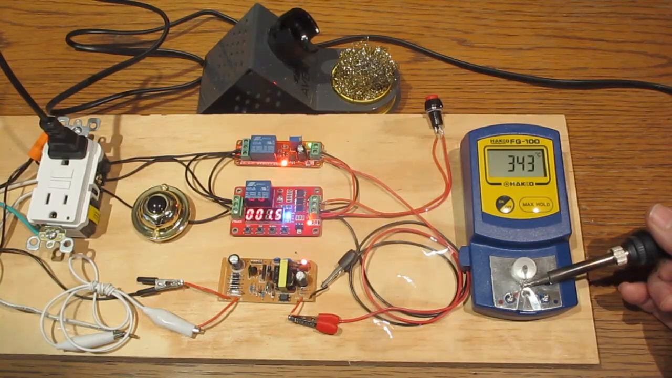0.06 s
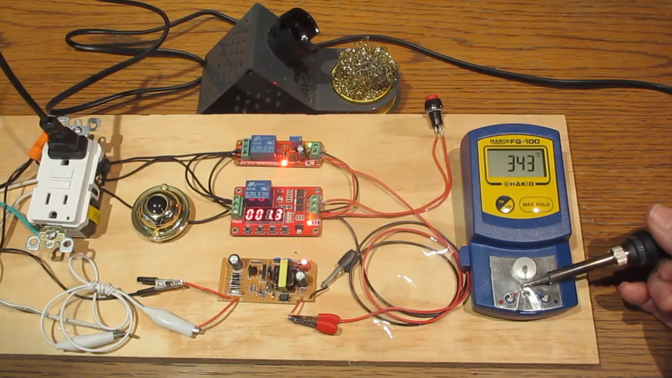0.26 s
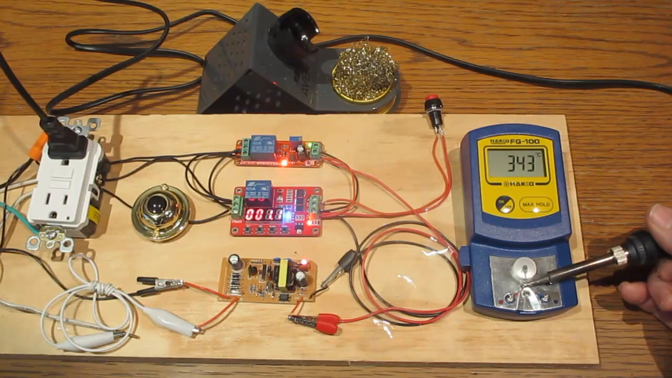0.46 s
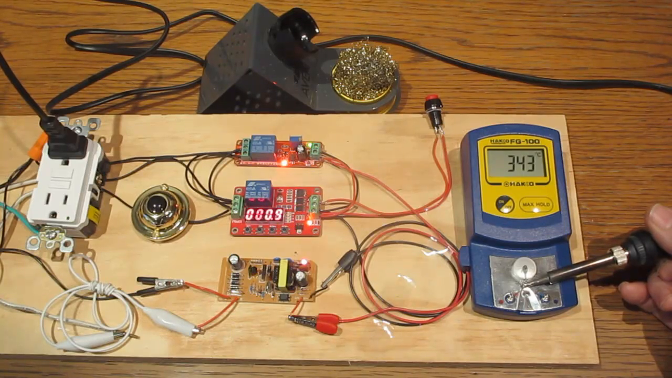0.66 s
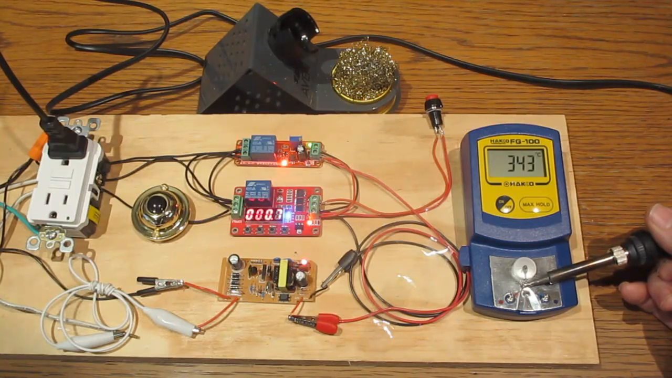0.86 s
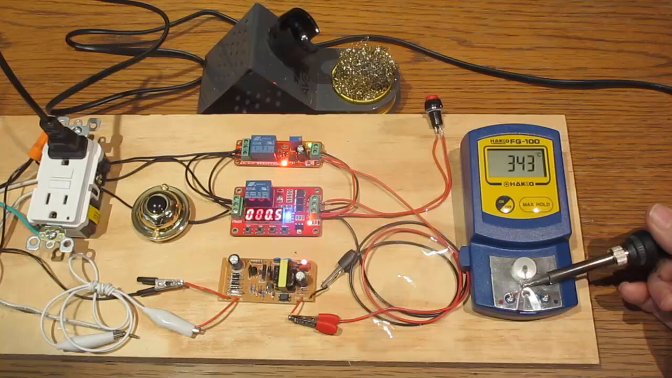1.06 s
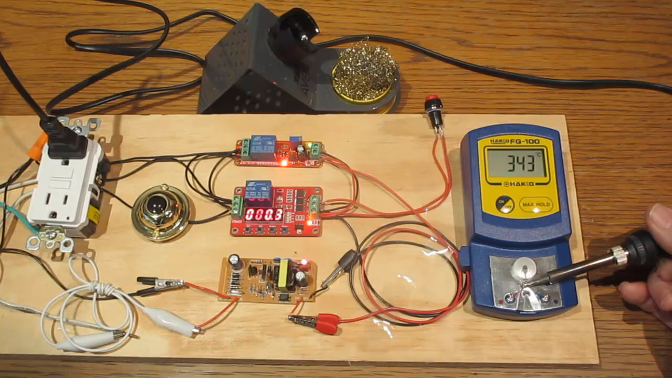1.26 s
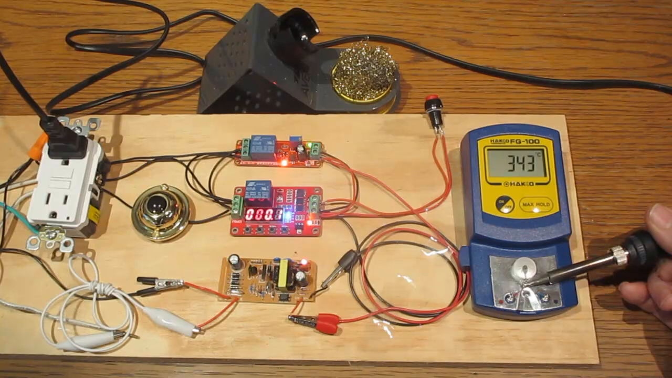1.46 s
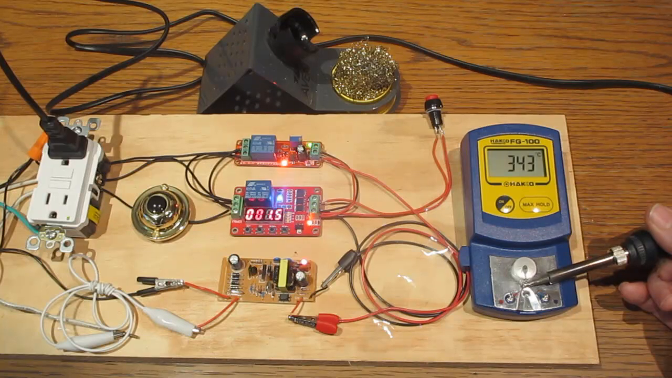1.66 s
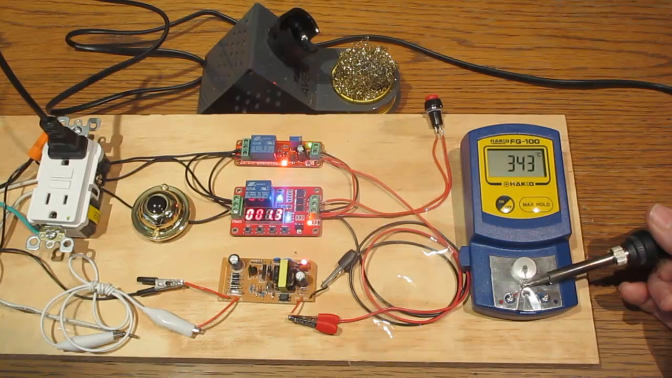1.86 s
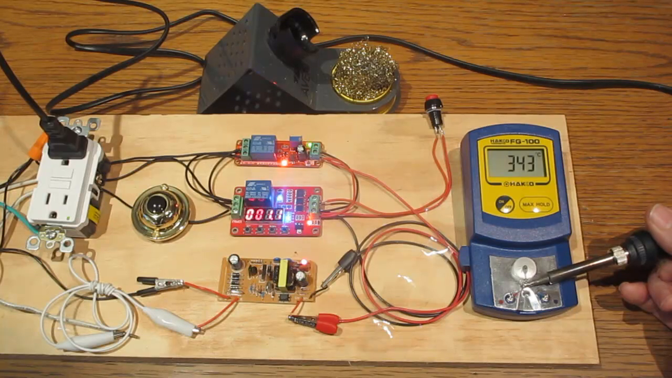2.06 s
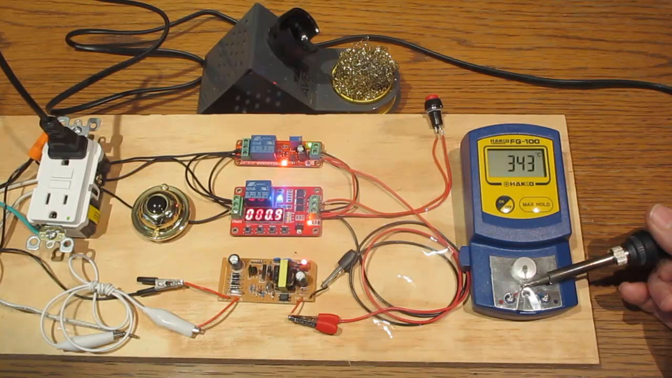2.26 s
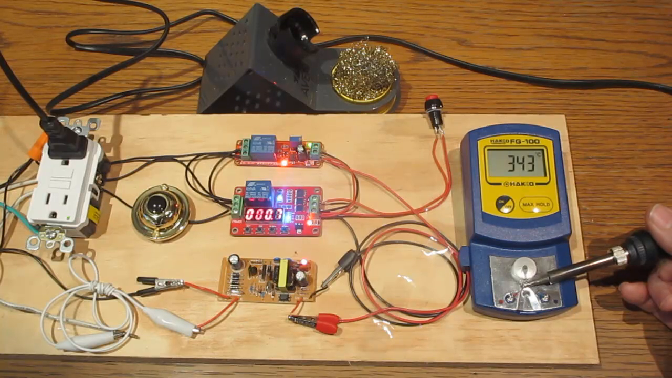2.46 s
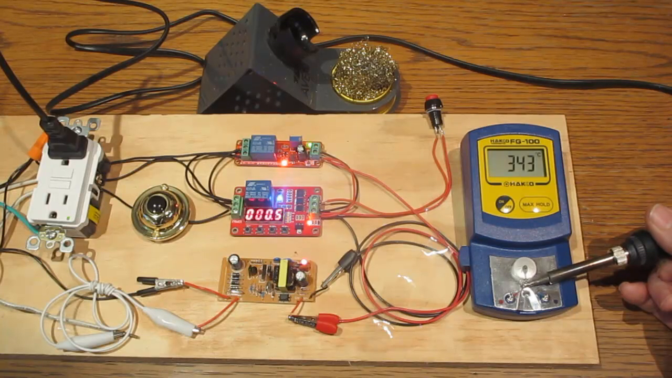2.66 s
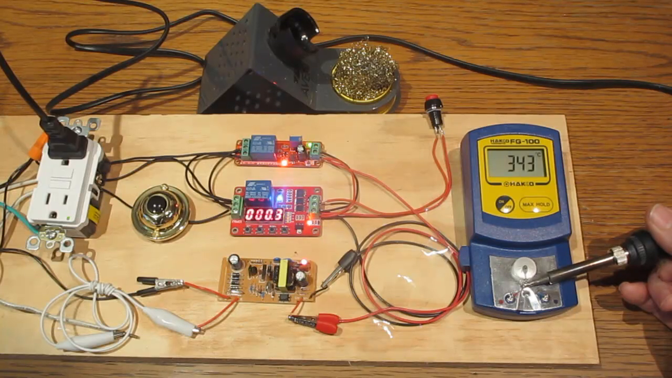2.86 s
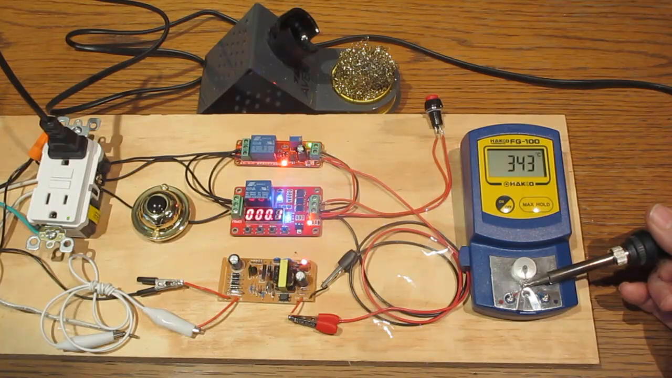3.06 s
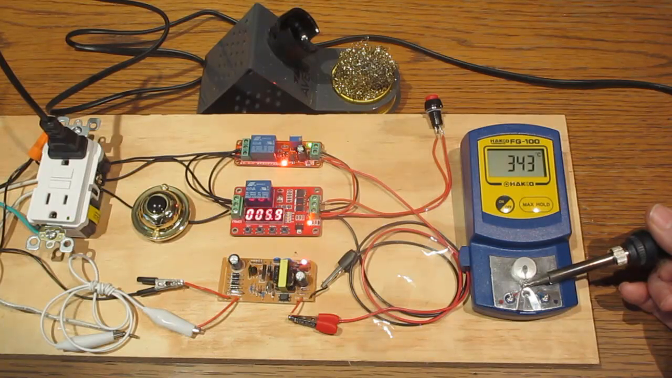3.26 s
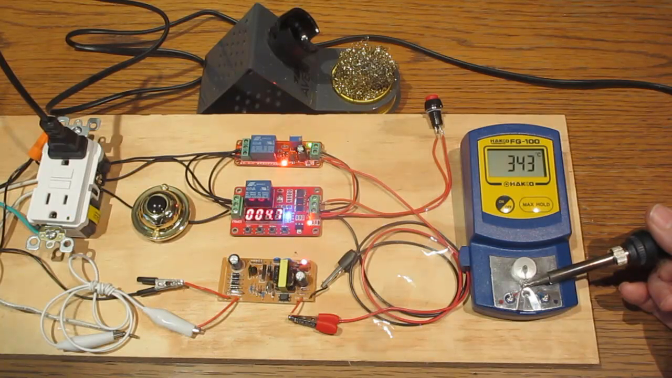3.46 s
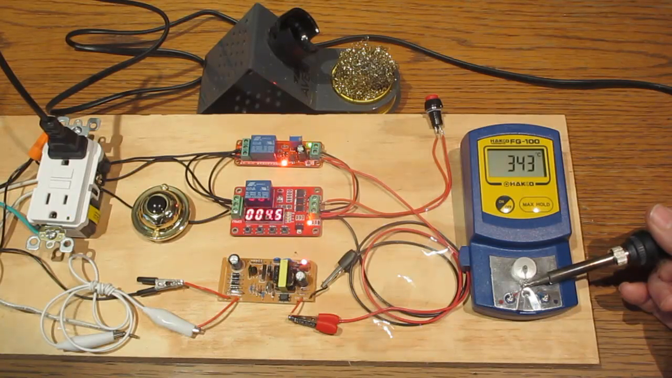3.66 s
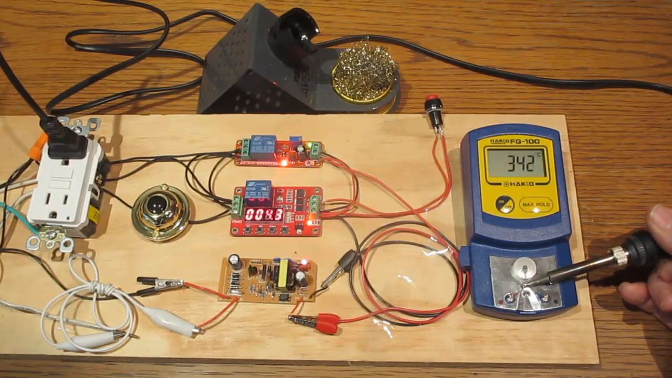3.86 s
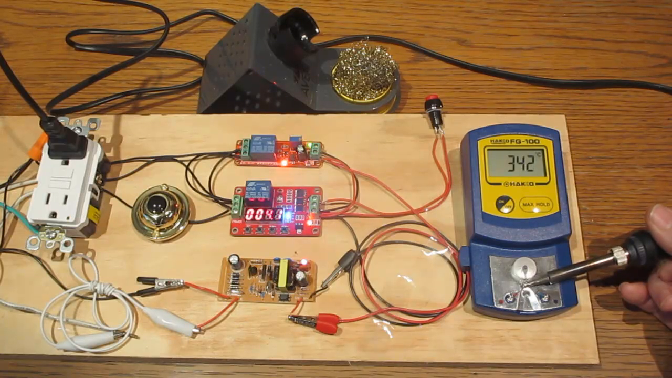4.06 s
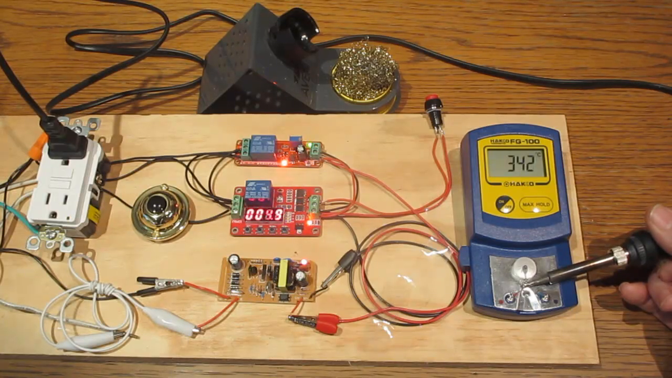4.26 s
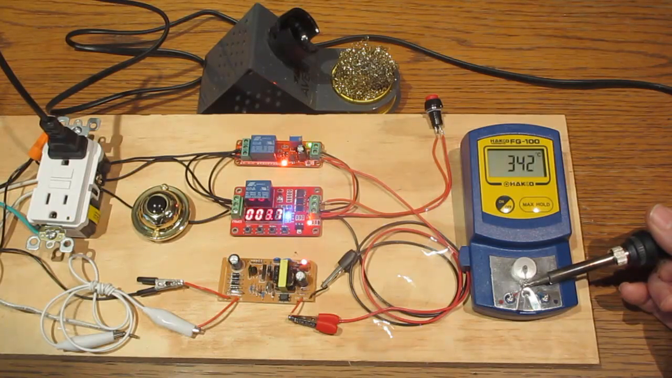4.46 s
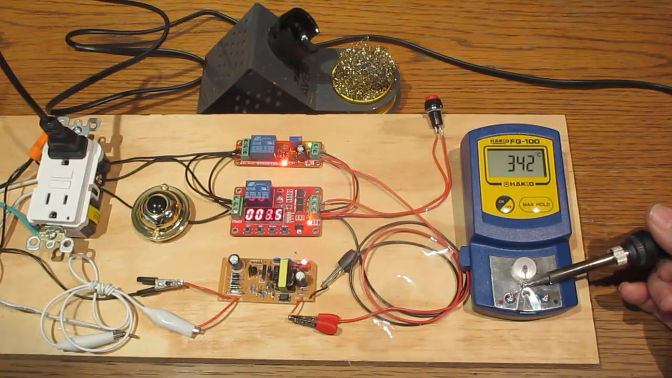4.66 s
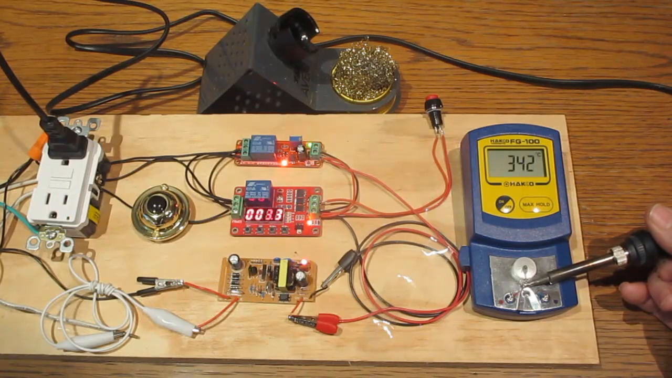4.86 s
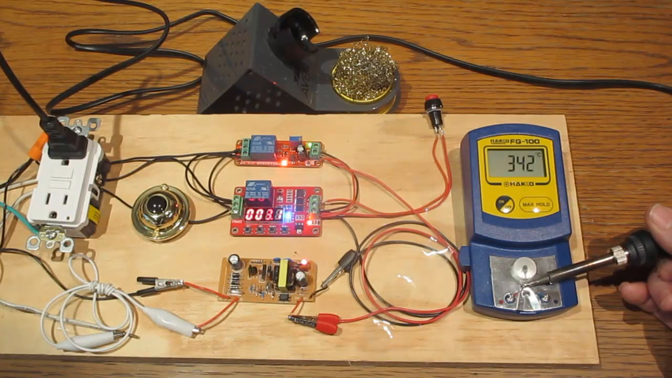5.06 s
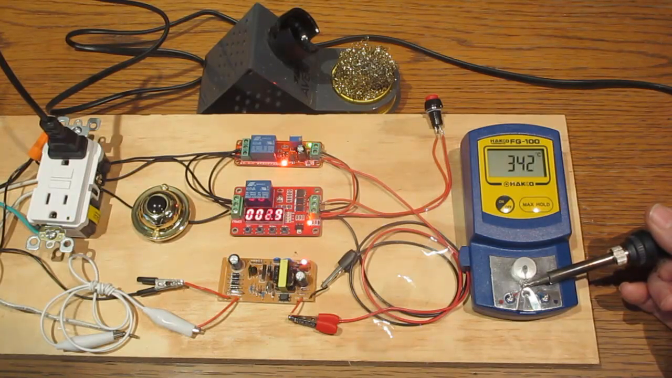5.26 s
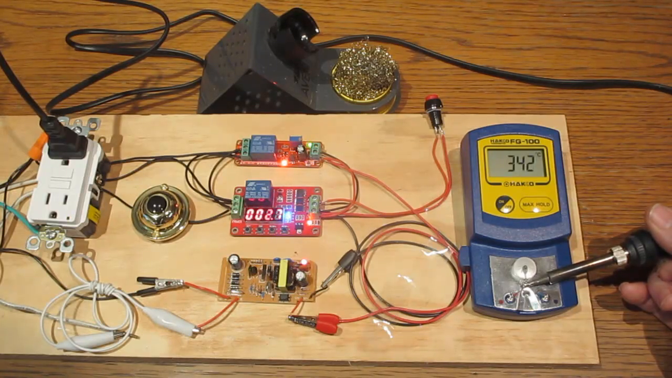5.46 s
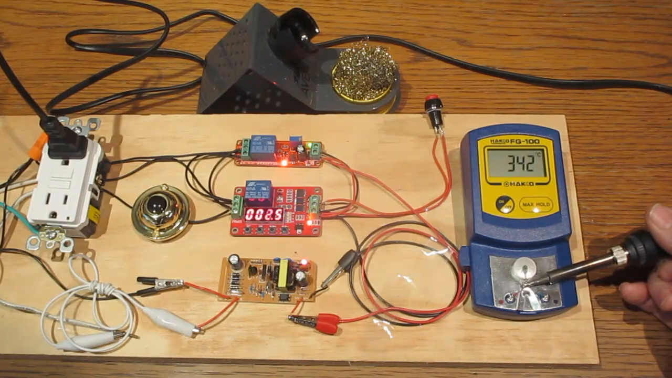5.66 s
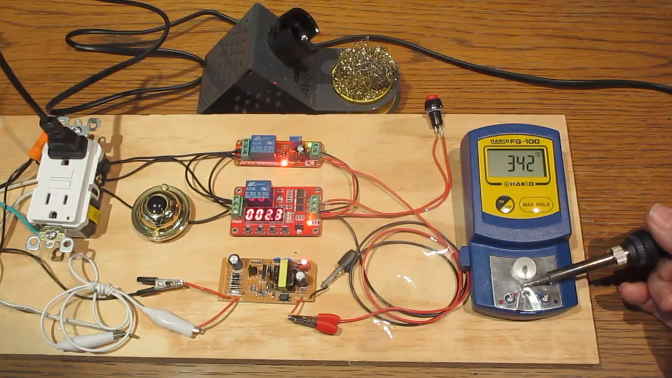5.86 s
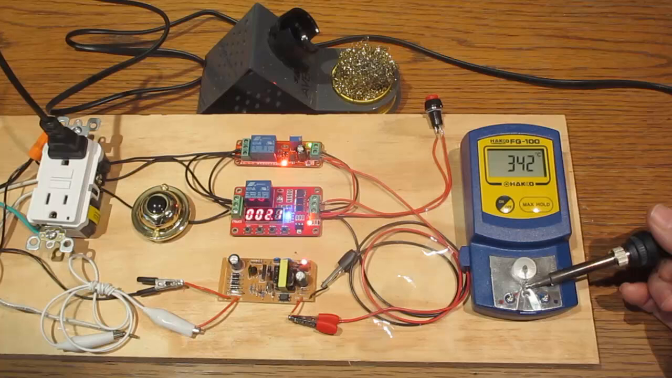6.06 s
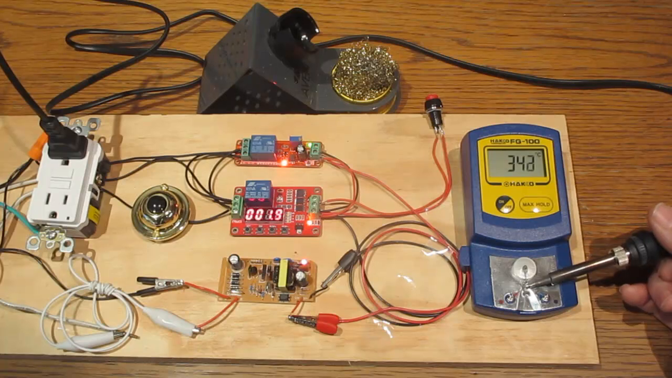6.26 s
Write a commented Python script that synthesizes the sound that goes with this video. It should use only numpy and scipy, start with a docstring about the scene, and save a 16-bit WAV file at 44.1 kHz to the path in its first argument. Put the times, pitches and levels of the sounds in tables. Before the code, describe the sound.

Over a low room hum and airy fan noise, two crisp relay clicks sound well apart, and near the end something rubs briefly on the bench.

```python
"""A small relay on a wooden bench clicks as it pulls in and later as it drops out, heard by two close microphone ports.
Each click is a few impacts that ring the case, a noise rattle, a knock of the board and echoes off bench and walls.
Behind it are shaped ventilation noise, a fading rumble, a whirr on the left, mains hum and the thin tones
of two small motors. Near the end something scuffs briefly on the bench: gritty noise in five short strokes."""
import sys
import numpy as np
from scipy import signal
from scipy.fft import rfft, irfft
from scipy.io import wavfile

SR = 44100
rng = np.random.default_rng(int(sys.argv[2]) if len(sys.argv) > 2 else 0)


def level_to_linear(level):
    """Convert decibel levels to linear amplitude factors, elementwise."""
    exponent = np.asarray(level, float) / 20
    return 10 ** exponent


def master_out(mix):
    """Clip the mix to full scale and print it as 16-bit PCM to the path in sys.argv[1]."""
    frames = np.transpose(np.atleast_2d(mix))
    ceiling = np.clip(frames, -1, 1)
    pcm = np.round(ceiling * 32767).astype(np.int16)
    wavfile.write(sys.argv[1], SR, pcm)


N = 278271
T = np.arange(N) / SR
F = np.fft.rfftfreq(N, 1 / SR) + 1e-3  # Hz, kept just above zero for logs and divisions
MAINS_HZ = 60.006

# Impacts as the armature pulls in and bounces. Each row: time [s], level [dB].
PULL_IN_IMPACTS = [(1.62261, -6), (1.62343, -17.5), (1.62411, -15.5)]
# Impacts as the contact spring snaps back and chatters. Each row: time [s], level [dB].
DROP_OUT_IMPACTS = [(3.22348, -24), (3.22384, -17), (3.22514, -27), (3.22616, -19)]
# The parts come to rest against each other and choke the ring:
# time of rest [s], time to fall 60 dB after it [s], rattle level until then [dB].
PULL_IN_REST = (1.62418, 0.0214, -33)
DROP_OUT_REST = (3.2293, 0.018, -35)


def level(x, db):
    """Scale to an rms level in dB."""
    return x * level_to_linear(db) / np.sqrt(np.mean(x ** 2))


def shaped(gain):
    """Noise with a given gain per frequency."""
    return irfft(rfft(rng.standard_normal(N)) * gain, N)


def colour(hz, db):
    """Gain per frequency, drawn through points in Hz and dB."""
    return level_to_linear(np.interp(np.log(F), np.log(hz), db))


def peak(hz, width):
    """Gain per frequency of a resonance applied twice."""
    return 1 / (1 + ((F - hz ** 2 / F) / width) ** 2)


def walk(rate):
    """Slow random drift, up to about `rate` changes a second, with an rms of 1."""
    return level(shaped(np.exp(-(F / rate) ** 2) * (F > .01)), 0)


def delayed(x, seconds):
    """Sound arrives later: each frequency is turned back by its share of a cycle."""
    return irfft(rfft(x) * np.exp(-2j * np.pi * F * seconds), N)


def air():
    """Ventilation noise from all around: alike at both ports in the bass, unrelated in the treble."""
    # Each row: frequency [Hz], relative strength per Hz [dB], side minus mid [dB].
    air_tone = [(25.28, -16, -28.5), (44.78, -11.5, -34), (70, -9.5, -31.5), (99, -9, -37.5),
                (139.3, -2.5, -40), (186.8, -7, -38.5), (251, 2.5, -29), (328, -6, -8.5), (450, -8, -7),
                (695, -12, -7), (1031, -17, 2.5), (1408, -18.5, -5.5), (2170, -24, -3), (3500, -32.5, -0.5),
                (5430, -37.5, 0.5), (7650, -37, -1), (9000, -44, -0.5), (10670, -46.5, -0.5),
                (10540, -58, 2)]
    # Slow level of the ventilation. Each row: time [s], level [dB].
    air_level = [(0, -47.5), (.9, -48), (1.6, -49.5), (4.0, -49), (4.6, -47), (5.4, -48.5), (6.31, -48)]
    hz, tone_db, side_db = np.transpose(air_tone)
    mid = shaped(colour(hz, tone_db))
    side = shaped(colour(hz, tone_db + side_db))
    both = mid + side * np.array([[1], [-1]])
    return level(both, 0) * level_to_linear(np.interp(T, *np.transpose(air_level)))


def rumble():
    """Two low bands of noise that die away, with bell-shaped surges on top."""
    start_db, fade_db_per_s, surge_s = -57.5, 1.3, 0.13
    # Each row: frequency [Hz], width [Hz], relative strength [dB].
    bands = [(46.6, 15, 1.5), (99, 31, 10.5)]
    # Each row: time of the surge [s], level [dB].
    surge_rows = [(.2, -64), (.52, -55), (1.19, -57)]
    noise = level(shaped(sum(level_to_linear(db) * peak(hz, width) for hz, width, db in bands)), 0)
    surges = sum(level_to_linear(db) * np.exp(-((T - s) / surge_s) ** 2) for s, db in surge_rows)
    return noise * (level_to_linear(start_db - fade_db_per_s * T) + surges)


def whirr():
    """A band of noise around one broad resonance, close to the left port only."""
    hz, width_hz, rms_db = 1090, 555, -54.5
    return level(shaped(peak(hz, width_hz)), rms_db) * np.array([[1], [0]])


def hum():
    """Three hums near twice the mains rate, a fraction of a hertz apart: their sum swells and cancels."""
    main_db = -56  # rms
    # Neighbours of the main hum. Each row: Hz above it, level [dB rms], time when in step with it [s].
    neighbours = [(.111, -58.1, 7.19), (.574, -61.3, .54)]
    beats = sum(level_to_linear(db) * np.exp(2j * np.pi * above * (T - in_step_s))
                for above, db, in_step_s in neighbours)
    carrier = np.exp(4j * np.pi * MAINS_HZ * T)
    return np.sqrt(2) * ((level_to_linear(main_db) + beats) * carrier).imag


def tones(hz, partials):
    """Whole multiples of one machine's base rate, each wavering slowly in level."""
    out = 0
    for multiple, db, waver_db in partials:
        strength = np.sqrt(2) * level_to_linear(db + waver_db * walk(2.9))
        out = out + strength * np.sin(2 * np.pi * (multiple * hz * T + rng.random()))
    return out


def machines():
    """Mains tones and the thin tones of two small motors, one of them driving a fan."""
    fan_hz, motor_hz = 244.9, 139.65
    # Each row of these three: multiple of the base rate, level before wavering [dB rms], waver [dB].
    mains_tones = [(4, -62.5, 4), (5, -54.5, 2)]
    fan_tones = [(1, -57.5, 0.96), (2, -60.5, 0.6), (3, -74, 1.8)]
    motor_tones = [(2, -61, 2.2), (4, -72, 1.3), (5, -76, 1.7), (6, -72, 1)]
    return tones(MAINS_HZ, mains_tones) + tones(fan_hz, fan_tones) + tones(motor_hz, motor_tones)


def room(x):
    """Dense echoes: quick ones off the bench clutter, much alike at both ports, then the walls, unrelated."""
    wall_db, wall_t60_s, bench_db, bench_t60_s = -16.5, 0.25, -14, 0.031
    bench_side_db = -6  # bench echoes come mostly from ahead
    t = T[:SR // 2]

    def fade(db, t60):
        """Echoes start after 3 ms and fall 60 dB in t60 seconds."""
        return level_to_linear(db - 60 * t / t60) / np.sqrt(t60 * SR / 14) * (t > .003)

    mid, side, left, right = rng.standard_normal((4, len(t)))
    bench = mid + level_to_linear(bench_side_db) * side * np.array([[1], [-1]])
    walls = np.array([left, right])
    echoes = bench * fade(bench_db, bench_t60_s) + walls * fade(wall_db, wall_t60_s)
    return signal.fftconvolve(x, echoes, axes=1)[:, :N]


def scuff():
    """A short gritty rub: uneven grains in strokes that catch, build up and let go, then a faint tail."""
    rise_s, fall_s, tail_db, tail_t60_s = 0.007, 0.0056, -62, 0.27
    right_lag_s = 3.6e-5  # the scuff reaches the right port later
    # Each row: time of the stroke's peak [s], level [dB], brightness tilt [dB per octave].
    stroke_rows = [(5.944, -52, -1), (5.956, -55.5, 1.5), (5.970, -45.5, 1.5), (5.981, -51, -1.5),
                   (5.992, -46.5, 2)]
    # Shared colour before the tilt. Each row: frequency [Hz], relative strength per Hz [dB].
    scuff_tone = [(500, -9), (900, 6.5), (1400, -4), (2000, 4), (2700, -11.5), (3600, -7.5), (4400, -11),
                  (5300, -6.5), (6400, -10), (7200, -9.5), (7800, -15), (8600, -3), (9300, -12), (10000, 0),
                  (10800, -6), (11400, -25)]
    hz, tone_db = np.transpose(scuff_tone)
    grain_db = 2.6 * rng.exponential(size=N) + 1.8 * walk(230.0)
    grit = rfft(rng.standard_normal(N) * level_to_linear(grain_db))

    def rub(tilt_db):
        """The same grit, made duller or brighter around 2 kHz."""
        return level(irfft(grit * colour(hz, tone_db + tilt_db * np.log2(hz / 2000)), N), 0)

    out = 0
    for s, db, tilt_db in stroke_rows:
        swell = np.exp(-np.abs(T - s) / np.where(T < s, rise_s, fall_s))
        out = out + rub(tilt_db) * level_to_linear(db) * swell
    since = T - stroke_rows[-1][0]
    out = out + rub(0) * (since > 0) * level_to_linear(tail_db - 60 * np.abs(since) / tail_t60_s)
    return np.array([out, delayed(out, right_lag_s)])


def board():
    """The wooden board under the relay knocks in a few modes as the parts come to rest."""
    # Each row: frequency [Hz], time to fall 60 dB [s], level pulling in [dB], level dropping out [dB].
    modes = [(316, .06, -53.5, -40), (637.3, 0.077, -57, -47), (801, .05, -55.5, -44),
             (1040, 0.056, -50, -44), (1260, 0.066, -51, -54), (1619, .07, -47.5, -50),
             (2370, 0.038, -55.5, -50), (2690, 0.09, -52, -81)]
    hz, t60, pull_db, drop_db = np.transpose(modes)[:, :, None]
    out = 0
    for s, db in ((PULL_IN_REST[0], pull_db), (DROP_OUT_REST[0], drop_db)):
        t = np.clip(T - s, 0, 1)
        out = out + (level_to_linear(db - 60 * t / t60) * np.sin(2 * np.pi * hz * t)).sum(axis=0)
    return out


def cracks():
    """Each click as sent into the room: one sharp impulse through the broad resonances of the case."""
    # Sound leaving to all sides. Each row: frequency [Hz], level pulling in [dB], dropping out [dB].
    case_tone = [(1800, -20.5, -18), (2570, 7, -27), (3150, -4.5, 9), (3460, -23.5, 10), (3850, -12, 0),
                 (4103, 14.5, 9.5), (4795, 18.5, 7), (5170, -3, -5), (5500, 11.5, 6), (5957, 16.5, 9),
                 (6350, 12, 9), (6710, -6, -10), (7134, 13, 0), (7750, 8.5, 7), (8300, -5, 7),
                 (8650, 7.5, 14.5), (9070, 14.5, 10), (9510, -3, -8), (9950, 14.5, -1), (10500, 16.5, -15),
                 (11340, 1.5, -23)]
    hz, pull_db, drop_db = np.transpose(case_tone)
    # dropping out, the second impact is the one that cracks
    clicks = ((PULL_IN_IMPACTS[0][0], pull_db), (DROP_OUT_IMPACTS[1][0], drop_db))
    return sum(irfft(colour(hz, db) * np.exp(-2j * np.pi * F * s), N) for s, db in clicks)


def relay():
    """Each impact rings the same case and spring modes, while loose parts rattle until they rest."""
    right_lag_s = 3e-5  # rings reach the right port a moment later
    low_cut_hz = 2200
    # Each row: frequency [Hz], time to fall 60 dB [s], level pulling in [dB],
    # level dropping out [dB], left minus right [dB]; all before the choke and the bass cut.
    modes = [(1620.0, 0.05, -30, -21, 1), (4310.0, 0.0017, -6, -5, 2), (3310.0, 0.0534, -39, -17, 0),
             (4340.0, 0.0174, -2, -5, -2), (4170.0, 0.0412, -14, -10, -3), (5570.0, 0.0147, -17, -30, -13),
             (5970.0, 0.0214, -16, -14, -2), (7180.0, 0.0073, -14, -4, 0), (7970.0, 0.0189, -11, -13, 3),
             (8160.0, 0.0106, -35, -22, 20), (8700.0, 0.0134, -10, -1, 6), (9870.0, 0.036, -24, -31, 8),
             (10040.0, 0.0047, -3, -10, 4)]
    # Rattle against case and board. Each row: frequency [Hz], relative strength per Hz [dB].
    rattle_tone = [(300, -21.5), (900, -10.5), (1700, -6.5), (2500, -14), (3500, -0.5), (4700, 0.5),
                   (5600, -4), (6600, -10), (7800, -1), (9300, -9), (10500, -15)]
    rings, rattle_level = np.zeros((2, N)), np.zeros(N)
    hz, t60, pull_db, drop_db, pan_db = np.transpose(modes)[:, :, None]
    sign = (-1.) ** np.arange(len(hz))[:, None]  # alternate rows start in opposite directions
    moves = ((PULL_IN_IMPACTS, pull_db, PULL_IN_REST), (DROP_OUT_IMPACTS, drop_db, DROP_OUT_REST))
    for impacts, mode_db, (rest_s, rest_t60, rattle_db) in moves:
        choke = level_to_linear(-60 * np.clip(T - rest_s, 0, 1) / rest_t60)
        rattle_level += level_to_linear(rattle_db) * choke * (T > impacts[0][0])
        for s, db in impacts:
            span = slice(int(s * SR), int((s + .04) * SR))
            for port, (lag, side) in enumerate(((0, .5), (right_lag_s, -.5))):
                t = np.maximum(T[span] - s - lag, 0)
                ring = sign * np.sin(2 * np.pi * hz * t) * level_to_linear(-60 * t / t60)
                struck = level_to_linear(db + mode_db + side * pan_db) * ring
                rings[port, span] -= choke[span] * struck.sum(axis=0)
    # so small a body radiates almost no bass
    bass_cut = signal.butter(2, low_cut_hz, "high", fs=SR, output="sos")
    rings = signal.sosfilt(bass_cut, rings)
    return rings, rattle_level * level(shaped(colour(*np.transpose(rattle_tone))), 0)


def scene():
    """Relay and scuff with their echoes, over the steady noise and hum of the room."""
    # rings beam towards the microphone ports and the rattle away: dB of each as the room hears them
    ring_to_room_db, rattle_to_room_db = -17, -7.5
    background = air() + rumble() + whirr() + hum() + machines()
    rub = scuff()
    rings, rattle = relay()
    around = level_to_linear(ring_to_room_db) * rings + level_to_linear(rattle_to_room_db) * rattle
    echoes = room(around + cracks() + rub)
    return background + rub + board() + rings + rattle + echoes


def band_limit(x):
    """A steep low-pass at the top of the band."""
    return signal.sosfilt(signal.butter(12, 11770, fs=SR, output="sos"), x)


def record(dry):
    """The camera cuts the top of the treble with a steep low-pass filter."""
    top_hz = 10950
    top_cut = signal.ellip(10, .2, 80, top_hz, fs=SR, output="sos")
    mix = signal.sosfilt(top_cut, dry)
    return band_limit(mix)


dry = scene()
out = record(dry)
master_out(out)
```